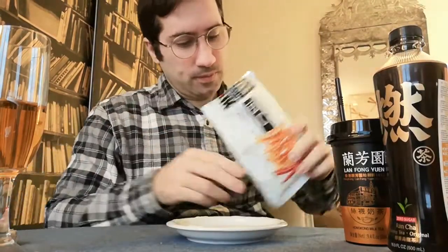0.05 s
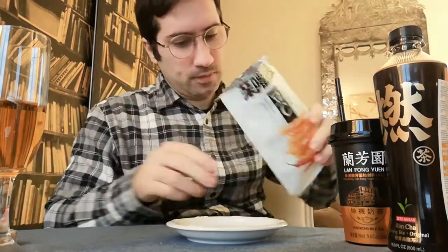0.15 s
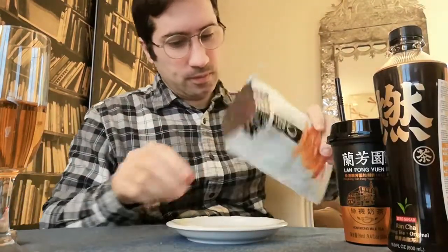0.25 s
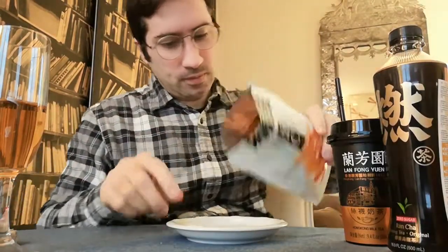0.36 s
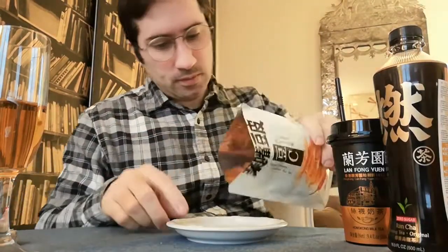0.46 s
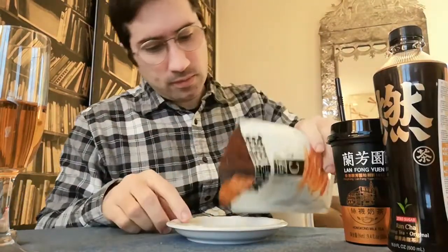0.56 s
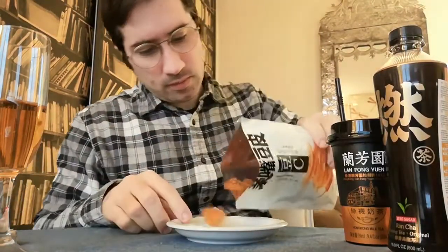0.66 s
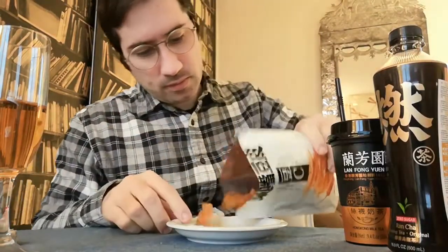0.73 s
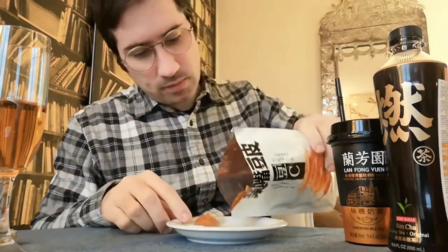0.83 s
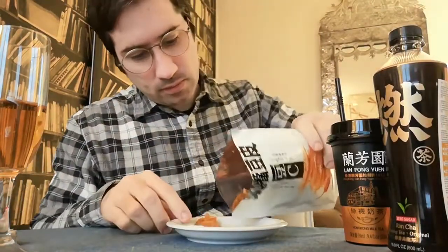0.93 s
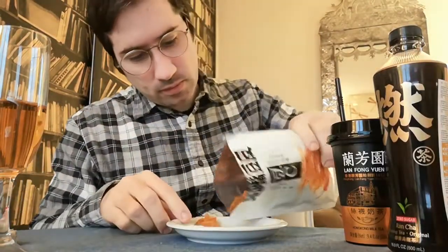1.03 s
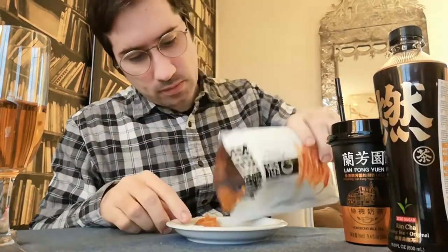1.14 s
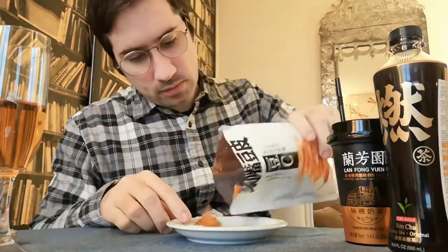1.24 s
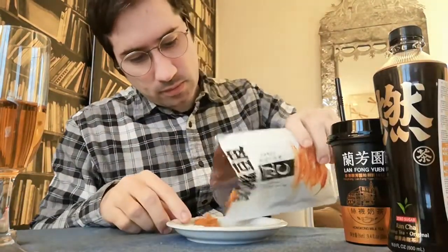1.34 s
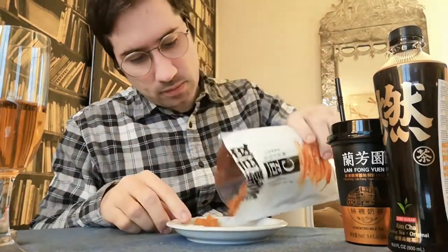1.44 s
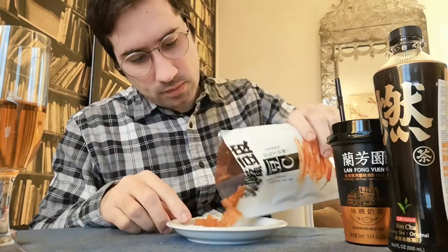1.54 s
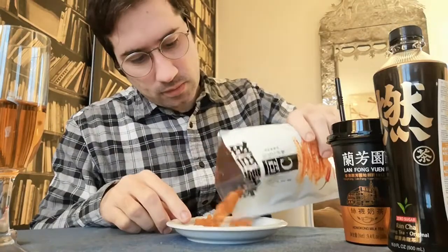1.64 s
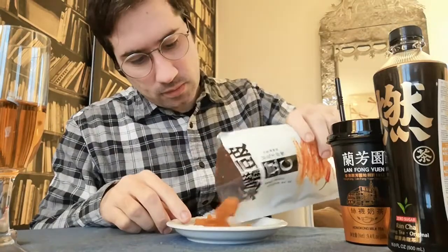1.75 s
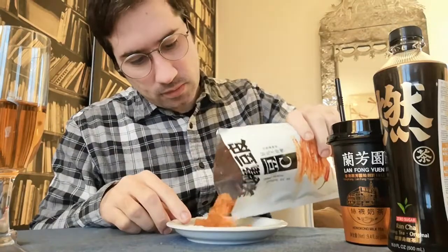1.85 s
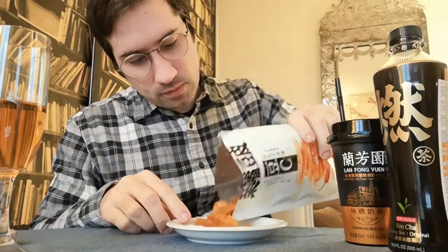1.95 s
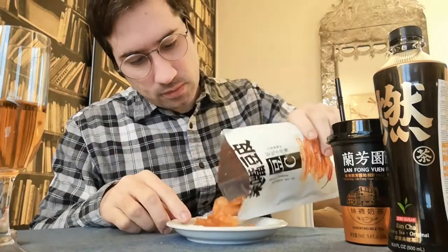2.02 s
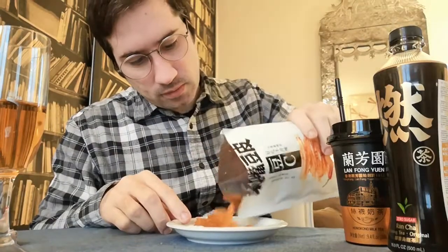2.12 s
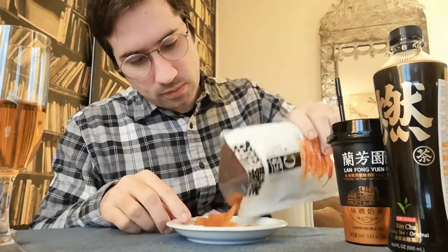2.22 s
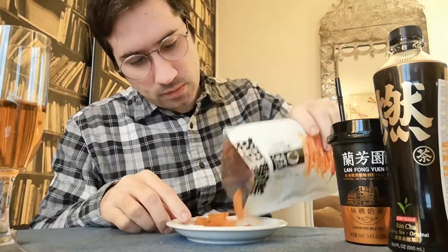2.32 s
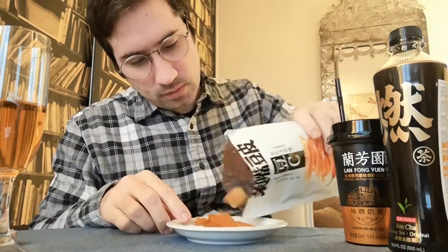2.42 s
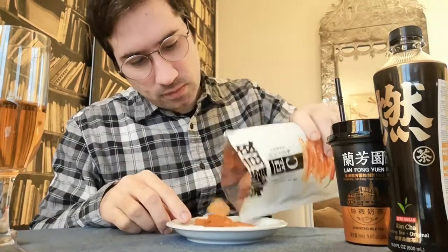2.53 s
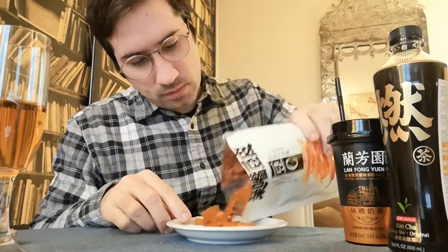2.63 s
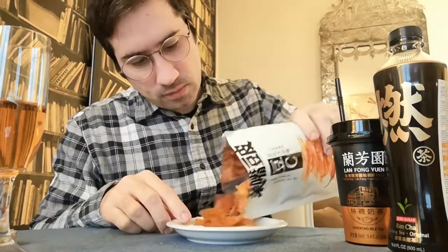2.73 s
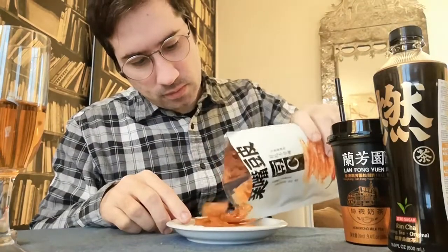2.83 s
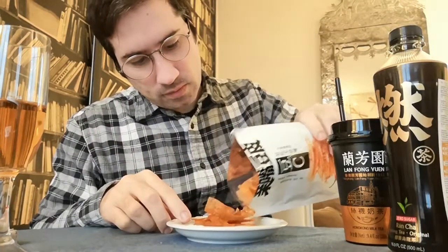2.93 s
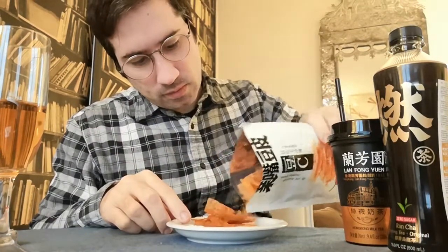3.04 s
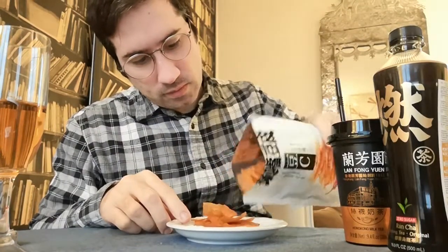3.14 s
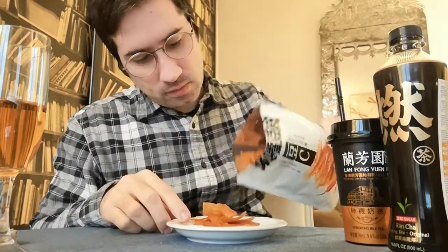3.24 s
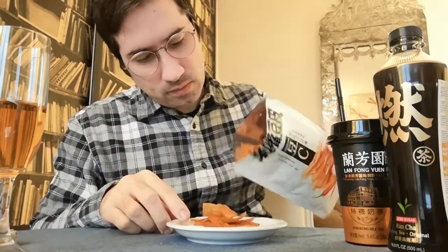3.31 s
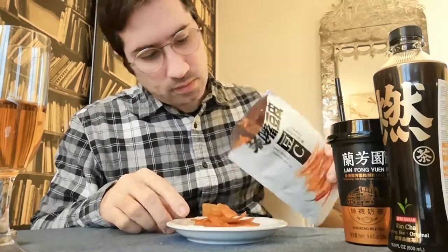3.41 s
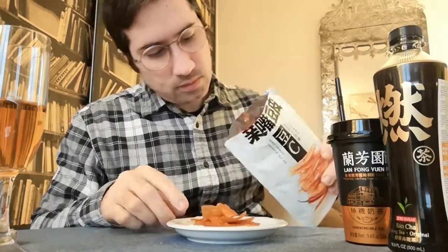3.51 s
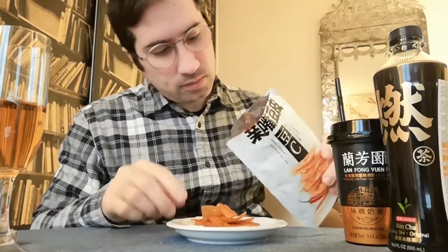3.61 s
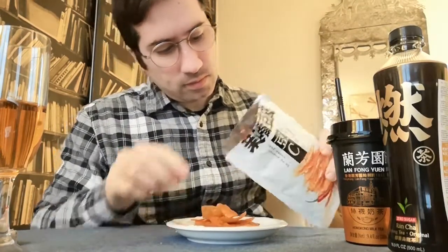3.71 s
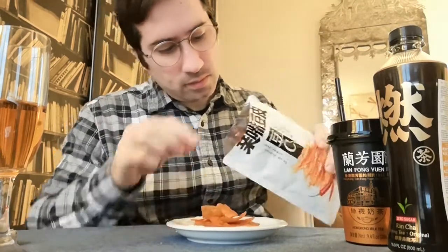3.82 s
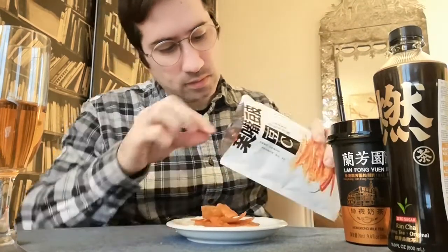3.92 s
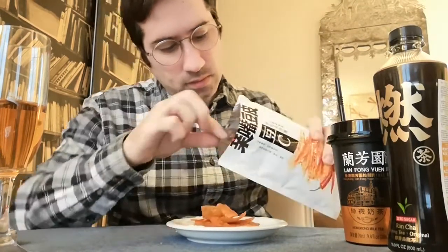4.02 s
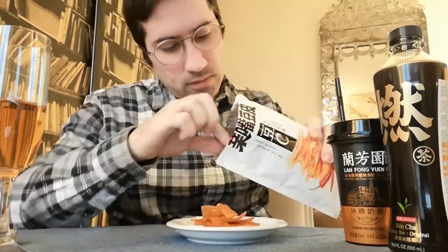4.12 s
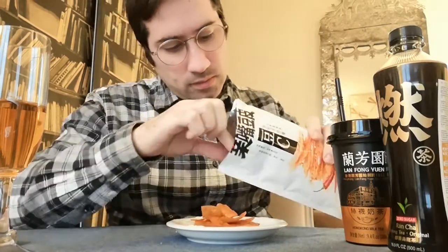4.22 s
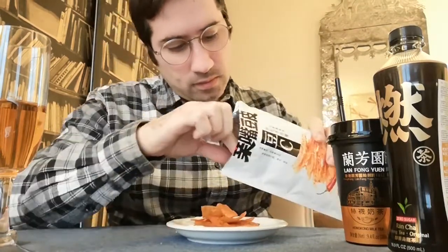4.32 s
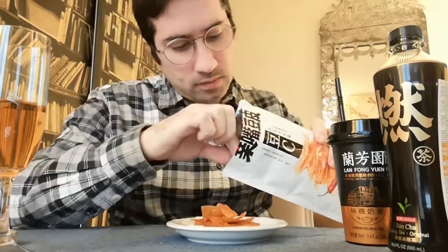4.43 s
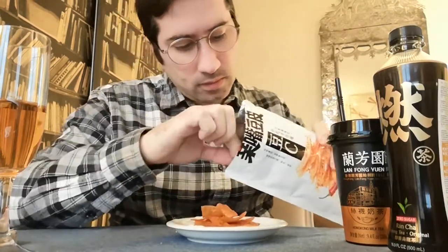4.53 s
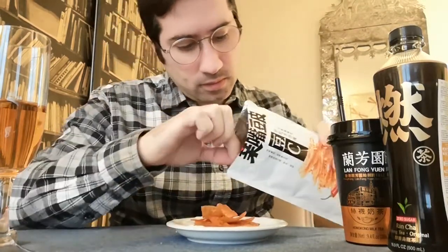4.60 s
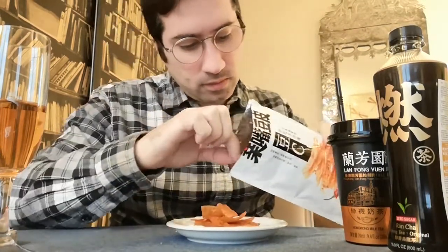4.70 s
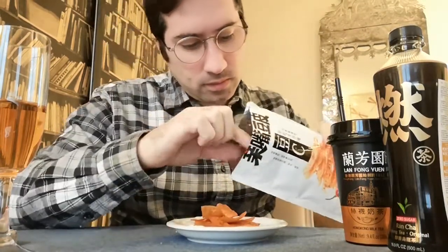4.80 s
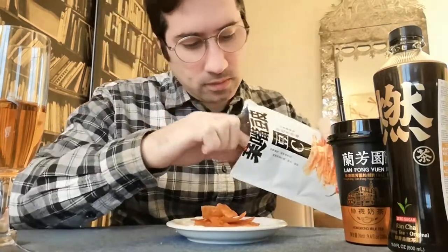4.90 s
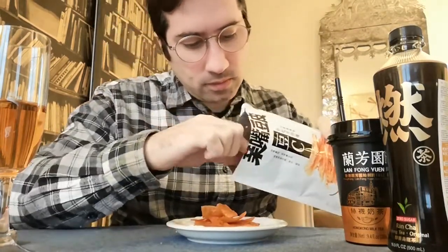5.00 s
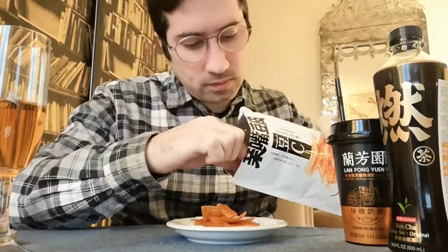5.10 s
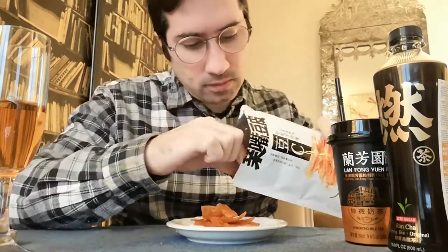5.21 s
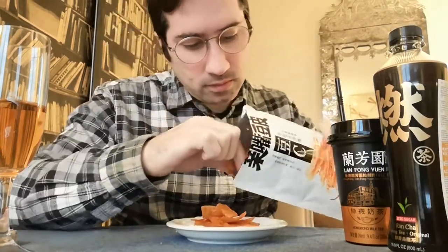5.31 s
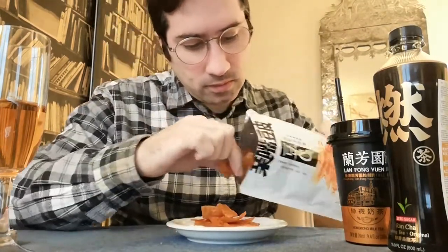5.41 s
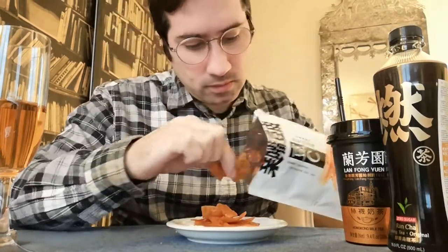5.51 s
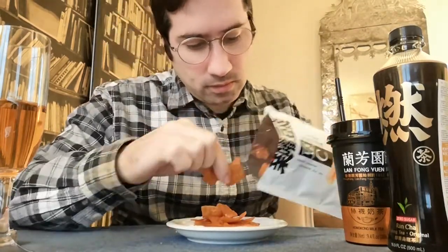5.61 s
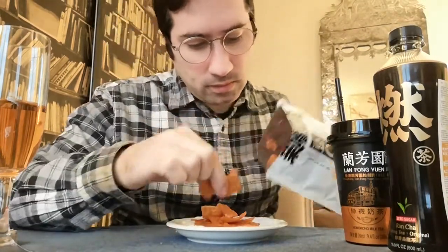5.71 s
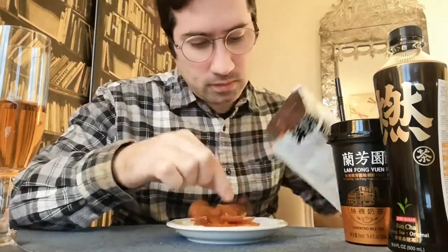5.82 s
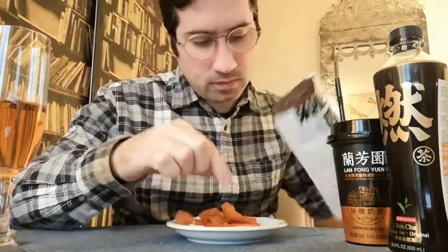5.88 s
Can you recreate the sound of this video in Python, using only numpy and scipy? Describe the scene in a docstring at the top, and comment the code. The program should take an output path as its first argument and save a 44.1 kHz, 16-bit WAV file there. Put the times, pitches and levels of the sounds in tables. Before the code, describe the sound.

Close up at a table in a small room, someone shakes dried flakes from a stiff plastic bag. Short crackles come first, then a run of sharp knocks as the bag hits a china plate, which rings faintly, mixed with crinkles and soft landings. The bag is tipped back with a tiny squeak. A pause follows, then a crisp snap and a few small rustles of fingers inside, over quiet room air and a low hum.

```python
"""A foil-plastic snack pouch is shaken over a china plate on a table in a small room, heard close in stereo.
First its film snaps and crinkles, fingers tap it, and dried flakes slide out and land softly. Then its stiff
edge knocks on the plate, which rings faintly while the table thumps. At 3 s the film squeaks as the pouch
is tipped back; after a lull, fingers pick inside it. Room air and an appliance hum lie under it all."""
import sys
import numpy as np
from scipy import signal
from scipy.fft import rfft, irfft, next_fast_len
from scipy.io import wavfile

SR = 44100
rng = np.random.default_rng(int(sys.argv[2]) if len(sys.argv) > 2 else 0)


def unload_audio(sound):
    """Save the sound as a 16-bit wav file, at the path given as the first command line argument."""
    columns = np.transpose(np.atleast_2d(sound))
    # keep every value between -1 and 1, then stretch to whole-number steps
    steps = np.round(np.clip(columns, -1, 1) * 32767)
    wavfile.write(sys.argv[1], SR, steps.astype(np.int16))


N = 262395

# the pouch's edge hits the plate: (time [s], level [dB])
KNOCK_HITS = [(0.8371, -11), (.981, -20), (1.1138, -15), (1.262, -8), (1.4163, -8), (1.511, -21),
              (1.571, -11.5), (1.693, -12.5), (2.278, -11.5), (2.589, -14.5), (2.746, -12)]
# the pouch is tipped, squeezed or fingered: (start [s], level [dB], length [s], tilt [dB/octave])
RUSTLE_MOVES = [(0, -43, 0.034, -0.5), (0.104, -48.5, .014, -1.5), (0.433, -51.5, 0.036, -0.5),
                (0.52, -37.5, 0.028, 1), (0.686, -52.5, 0.032, 4), (1.322, -52, .03, 2.5),
                (1.838, -62.5, 0.083, 4.5), (2.009, -47, 0.044, -1), (2.46, -50.5, 0.053, -4.5),
                (2.615, -41, 0.063, 1.5), (2.722, -47, 0.022, 3.5), (2.761, -47, .075, 0),
                (3.028, -61.5, 0.017, 0), (3.56, -70.5, 0.16, -6), (4.217, -64.5, 0.053, -4),
                (4.67, -53.5, 0.0089, -2.5), (5.021, -63.5, 0.13, -1.5), (5.161, -57, 0.029, 0.5),
                (5.225, -59.5, 0.079, -1.5)]


def knocks(usual_db=-12, brighten=0.86, rebound_s=.00164, rebound_share=.58, rebound_hz=3800):
    """The pouch wall pushes out and springs back, duller and inverted; harder knocks are brighter."""
    # tone of one push of the wall: (frequency [Hz], level [dB])
    wall_eq = [(30, -24), (90, 2.5), (280, -3.5), (420, -2), (880, -0.5), (1400, -3), (2100, -3.5),
               (3400, -11.5), (4700, -8.5), (6000, -19), (7100, -13.5), (9500, -30.5), (15000, -54)]
    out, spot_tail = np.zeros((2, N)), room_tail()
    rebound = lambda hz: np.exp(-2j * np.pi * hz * rebound_s) / (1 + 1j * hz / rebound_hz)
    for start, db in KNOCK_HITS:
        force_db = db - usual_db
        push = pulse(lambda hz: amp(along(wall_eq, hz) + brighten * force_db * hz / (hz + 2500)))
        knock = -filtered(push, lambda hz: 1 - rebound_share * rebound(hz))
        # blows on nearly the same spot share part of their reverb
        tail = .5 * spot_tail + np.sqrt(1 - .5 ** 2) * room_tail()
        add(out, start, amp(db) * in_room(knock, tail, wet_db=-3.5, near_db=-5.5))
        add(out, start, amp(-39.5 + 0.79 * force_db) * plate_ring())
    return out


def plate_ring(waver_hz=45, waver_depth=.35):
    """The struck china rings, and loose flakes on it make the ring waver."""
    # modes of the plate: (frequency [Hz], level [dB], t60 [s])
    china_modes = [(1822, -7.5, .58), (4150, -12, .35), (6826, -13, .28)]
    waver = unit(filtered(rng.standard_normal(SR // 2), lambda hz: np.exp(-(hz / waver_hz) ** 2)))
    return ring(china_modes) * (1 + waver_depth * waver)


def snaps_and_taps():
    """Crisp snaps of the film and dull finger taps on the pouch, each heard on its own."""
    # one snap or tap a row: (time [s], level [dB], pitch [Hz], treble [dB])
    hits = [(.0005, -22.5, 1070, -33), (.006, -17.5, 1580, -39), (.124, -17, 1610, -22),
            (.299, -43, 1000, -42), (.317, -38, 970, -32), (0.345, -38, 720, -33), (.418, -26.5, 1070, -44),
            (0.514, -28.5, 1510, -11), (.531, -20.5, 2470, -12), (.545, -19.5, 1980, -10),
            (.616, -26.5, 1580, -6), (.711, -27.5, 1740, 14), (1.447, -24.5, 1670, -28),
            (1.549, -24.5, 1710, -8), (2.0171, -30, 1560, -36), (2.422, -34, 1680, -30),
            (2.4854, -17.5, 2020, -15), (2.574, -35.5, 870, -17), (2.609, -21, 1700, -18),
            (2.646, -18.5, 1520, -9), (2.838, -25, 1490, -16), (2.9121, -32, 2770, -20),
            (2.9574, -35.5, 2630, -4), (4.426, -10.5, 2220, -11.5), (4.5333, -26, 1340, -14.5),
            (4.67, -28, 1170, -8), (4.745, -42, 2300, -22), (5.129, -40.5, 1090, -24),
            (5.1456, -30.5, 1140, -34), (5.158, -28.5, 1620, -15.5), (5.389, -47, 600, -21)]
    out = np.zeros((2, N))
    for start, db, pitch_hz, treble_db in hits:
        add(out, start, amp(db) * film_click(pitch_hz, treble_db))
    return out


def film_click(pitch_hz, treble_db, sharpness=1.61, soft_hz=5500):
    """Creased or tapped, the film gives one heavily damped swing, plus a crack set by treble_db."""
    # tone of the crack: (frequency [Hz], level [dB])
    crack_eq = [(40, -20), (100, -4), (600, 2.5), (2600, -11), (3700, -16), (4900, 0.5), (6000, -4.5),
                (7300, 3), (9000, -15.5), (15000, -34.5)]
    detune = lambda hz: (hz / pitch_hz - pitch_hz / (hz + 1)) / 2
    swing = lambda hz: 1 / (1 + (sharpness * detune(hz)) ** 2) / (1 + (hz / soft_hz) ** 4)
    click = pulse(lambda hz: np.hypot(swing(hz), amp(along(crack_eq, hz) + treble_db)))
    return in_room(click, room_tail(), wet_db=-7.0, near_db=-2)


def rustles(flake_hiss=0.21, attack_s=0.0065, release_s=.016):
    """Swarms of wrinkles over the hiss of sliding flakes; each builds, holds and dies away."""
    # tone of the wrinkling film: (frequency [Hz], level [dB])
    film_eq = [(60, -4), (200, 4.5), (500, -3.5), (900, -3.5), (2500, -5), (3700, -12.5), (5000, -12.5),
               (6000, -13.5), (7400, -14.5), (9500, -25.5), (15000, -39)]
    out = np.zeros((2, N))
    t = np.arange(SR // 2) / SR
    for start, db, length, tilt_db in RUSTLE_MOVES:
        grains = wrinkles(len(t)) + flake_hiss * rng.standard_normal(len(t))
        film = pulse(lambda hz: amp(along(film_eq, hz) + tilt_db * np.log2(1 + hz / 600)))
        squeeze = np.minimum(t / attack_s, 1) * np.exp(-np.maximum(t - length, 0) / release_s)
        swarm = unit(signal.fftconvolve(grains, film)[:len(t)]) * squeeze
        add(out, start, amp(db) * in_room(swarm, room_tail(), wet_db=-4.5, near_db=-5.5))
    return out


def wrinkles(n, per_s=1100, low_hz=400, high_hz=13000, spread_db=5, cycles=1.22):
    """Tiny buckles at random moments, each a swing or two at its own pitch and size."""
    count = max(int(per_s * n / SR), 1)
    t = np.arange(400) / SR
    when, pitch, size = rng.random((count, 3)).T[..., None]
    hz = low_hz * (high_hz / low_hz) ** pitch
    strength = hz * amp(spread_db * np.minimum(-np.log(1 - size), 2))  # short high ones swing wider
    swings = strength * np.sin(2 * np.pi * hz * t) * np.exp(-hz * t / cycles)
    positions = (when * n).astype(int) + np.arange(len(t))
    return unit(np.bincount(positions.ravel(), swings.ravel(), n)[:n])


def stray_snaps(count=5, per_s=33, centre_hz=1600, over_rustle_db=10, spread_db=7.5, settle_s=.05):
    """Small creases give way at uneven intervals with each rustle, and fade as the film settles."""
    out = np.zeros((2, N))
    for start, db, length, _ in RUSTLE_MOVES:
        for k in range(count):
            delay = (k + rng.random()) / per_s
            size, octaves = rng.uniform(-0.84, 1, 2)
            click = film_click(centre_hz * 2 ** octaves, treble_db=-12.5)
            settling = np.exp(-(max(delay - length, 0) / settle_s) ** 2)
            add(out, start + delay, amp(db + over_rustle_db + spread_db * size) * settling * click)
    return out


def table_thuds(knock_db=-46.5, attack_s=0.0008):
    """Soft landings, and the weight behind each knock, wake the low modes of the table top."""
    # flakes and the hand land by the plate: (time [s], level [dB])
    landings = [(0.448, -45), (0.539, -54), (0.728, -50), (2.02, -48.5), (2.48, -42.5)]
    # modes of the table top: (frequency [Hz], level [dB], t60 [s])
    table_modes = [(163.8, -2, 0.29), (233, 2.5, 0.11), (306, -11, 0.36)]
    out = np.zeros((2, N))
    for start, db in landings + [(when, knock_db) for when, _ in KNOCK_HITS]:
        boom = ring(table_modes)
        attack = 1 - np.exp(-np.arange(len(boom)) / SR / attack_s)
        add(out, start, amp(db) * boom * attack)
    return out


def grip_ticks(per_s=14, centre_hz=1260, softest_db=-51.5, spread_db=2):
    """The film ticks faintly at random moments while the hands work it."""
    # the hands work the pouch: (start [s], end [s])
    grips = [(.25, 3.05), (4.6, 5.48)]
    out = np.zeros((2, N))
    for start, end in grips:
        for when, size, pitch in rng.random((round(per_s * (end - start)), 3)):
            click = film_click(centre_hz * 2 ** (2 * pitch - 1), treble_db=-14)
            db = softest_db + spread_db * min(-np.log(1 - size), 2)
            add(out, start + when * (end - start), amp(db) * click)
    return out


def squeak(peak_s=3.044, db=-62, swell_s=0.015, pitch_hz=4850, width_hz=450):
    """The film rubs against itself with one thin chirp as the pouch is tipped back."""
    rub = filtered(rng.standard_normal(N), lambda hz: np.exp(-((hz - pitch_hz) / width_hz) ** 2))
    swell = np.exp(-((np.arange(N) / SR - peak_s) / swell_s) ** 2)
    return amp(db) * unit(rub) * swell


def room_tone(air_db=-67.5):
    """A quiet bed of room air and a low appliance hum."""
    # tone of the air: (frequency [Hz], level [dB])
    air_eq = [(20, -14), (46, -14), (63, -19.5), (90, -11), (240, -19.5), (500, -31), (1200, -30),
              (2300, -26.5), (3800, -34), (7000, -38.5), (10000, -46), (15500, -45.5)]
    # partials of the appliance: (frequency [Hz], level [dB])
    partials = [(49, -70.5), (165, -80), (230, -82)]
    t = np.arange(N) / SR
    hum = sum(amp(db) * np.sqrt(2) * np.sin(2 * np.pi * (hz * t + rng.random())) for hz, db in partials)
    return amp(air_db) * unit(diffuse(N, air_eq)) + hum


def in_room(sound, tail, wet_db, near_db):
    """The direct sound, its early reflections, then the room's reverb."""
    echoes = amp(wet_db) * tail + amp(near_db) * early_reflections(tail.shape[-1])
    out = signal.fftconvolve(sound[None], echoes, axes=1)
    add(out, 0, sound)
    return out


def early_reflections(n, decay_s=0.0023):
    """The table and the bottles on it scatter the sound within a few milliseconds."""
    t = np.arange(n) / SR
    cluster = diffuse(n, [(100, 0)]) * np.exp(-t / decay_s) * (1 - np.exp(-2 * t / decay_s))
    return cluster / np.linalg.norm(cluster) * np.sqrt(2)


def room_tail(build_s=0.0027):
    """The reverb builds up, then dies away at its own speed for each frequency."""
    # decay of the reverb: (frequency [Hz], t60 [s])
    decay_times = [(100, 0.58), (700, 0.32), (2000, 0.31), (5000, 0.34), (14000, 0.49)]
    # tone of the reverb: (frequency [Hz], level [dB])
    reverb_eq = [(60, -6), (150, -3.5), (300, 4), (600, -1), (1700, 5), (4000, 4), (7500, 0.5),
                 (14000, -1.5)]
    hz, t, spectra = signal.stft(diffuse(SR // 2, reverb_eq), SR, nperseg=256)
    fade = amp(-60 * t / along(decay_times, hz)[:, None]) * (1 - np.exp(-(t / build_s) ** 2))
    tail = signal.istft(spectra * fade, SR, nperseg=256)[1]
    return tail / np.linalg.norm(tail[0])


def diffuse(n, eq):
    """Stereo noise from all sides: alike in the bass, unrelated in the treble."""
    # likeness of left and right: (frequency [Hz], correlation [0-1])
    likeness = [(60, 1), (200, 0.93), (600, 0), (1400, 0.3), (3000, 0)]
    width = lambda hz: np.arccos(np.clip(along(likeness, hz), -1, 1)) / 2
    gains = lambda hz: amp(along(eq, hz)) * [np.cos(width(hz)), np.sin(width(hz))]
    mid, side = filtered(rng.standard_normal((2, n)), gains)
    return np.array([mid + side, mid - side])


def ring(modes):
    """Damped modes, struck at slightly new strengths each time."""
    t = np.arange(SR // 2) / SR
    return sum(amp(db + rng.standard_normal() - 60 * t / t60) * np.sin(2 * np.pi * hz * t)
               for hz, db, t60 in modes)


def pulse(gain, size=2048):
    """The tightest causal click with this gain over frequency, peak 1."""
    cepstrum = irfft(np.log(np.maximum(gain(np.fft.rfftfreq(size, 1 / SR)), 1e-6)))
    cepstrum[1:size // 2] *= 2
    cepstrum[size // 2 + 1:] = 0
    wave = irfft(np.exp(rfft(cepstrum)))
    return wave / np.abs(wave).max()


def filtered(x, response):
    """x through a frequency response."""
    n = x.shape[-1]
    padded = next_fast_len(n + 4096)
    return irfft(rfft(x, padded) * response(np.fft.rfftfreq(padded, 1 / SR)), padded)[..., :n]


def along(points, hz):
    """Read a curve of (frequency [Hz], value) points on a log axis."""
    freqs, values = np.transpose(points)
    return np.interp(np.log(hz + 1), np.log(freqs + 1), values)


def add(track, start, sound):
    """Mix a sound into the track from start [s]."""
    part = track[..., max(round(start * SR), 0):][..., :sound.shape[-1]]
    part += sound[..., :part.shape[-1]]


def amp(db):
    """Decibels to gain."""
    return 10 ** (np.asarray(db) / 20)


def unit(x):
    """x scaled to an rms of 1."""
    return x / np.sqrt(np.mean(x ** 2) + 1e-20)


def scene():
    """Everything that happens at the table, over the quiet of the room."""
    return (knocks() + snaps_and_taps() + squeak() + table_thuds() + room_tone()
            + stray_snaps() + rustles() + grip_ticks())


def record(dry, top_hz=15750):
    """The two microphone ports differ in colour and phase; a steep low-pass cuts the very top."""
    # balance of the ports: (frequency [Hz], left minus right [dB])
    balance = [(200, -0.5), (380, 1), (560, -14), (750, -7), (1000, -2.5), (2200, -2), (4400, 0.5),
               (6500, 6), (8200, 1.5), (12000, -3)]
    # phase between the ports: (frequency [Hz], left lead [rad])
    lead = [(120, 0), (340, 0.5), (780, -5.5), (1380, -5.5), (3270, -8), (3620, -7.5), (5680, -14.5),
            (6800, -17), (9040, -17)]
    ports = lambda hz: amp(along(balance, hz) * [[.5], [-.5]]) * np.exp(1j * along(lead, hz) * [[1], [0]])
    return filtered(filtered(dry, ports), lambda hz: 1 / (1 + (hz / top_hz) ** 120))


dry = scene()
out = record(dry)
unload_audio(out)
```